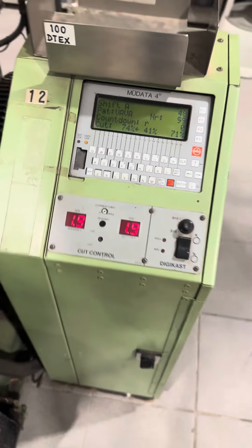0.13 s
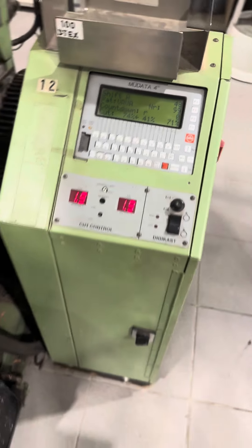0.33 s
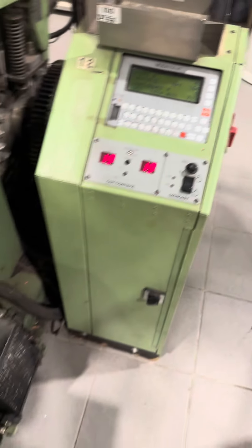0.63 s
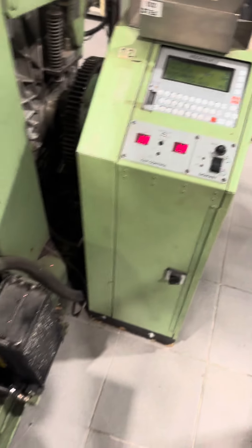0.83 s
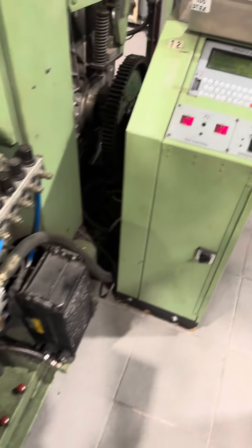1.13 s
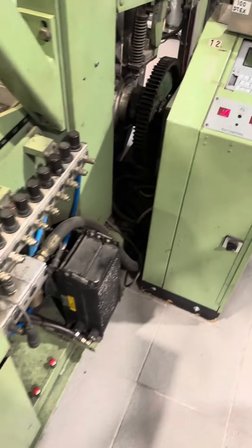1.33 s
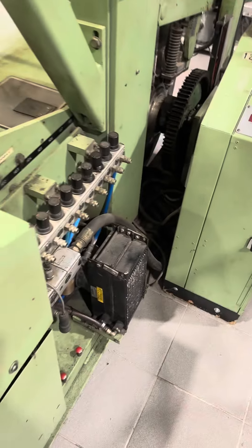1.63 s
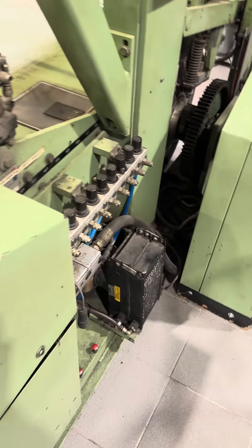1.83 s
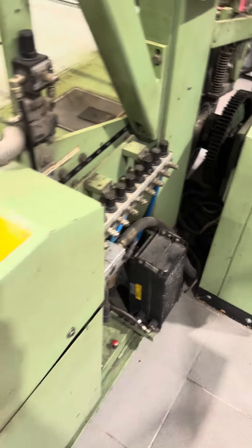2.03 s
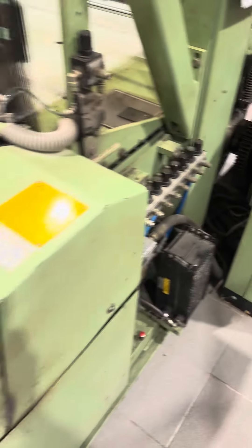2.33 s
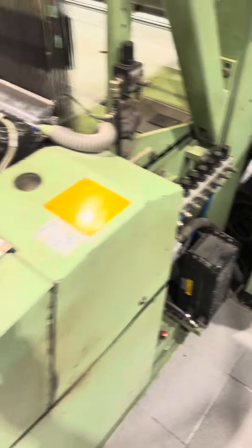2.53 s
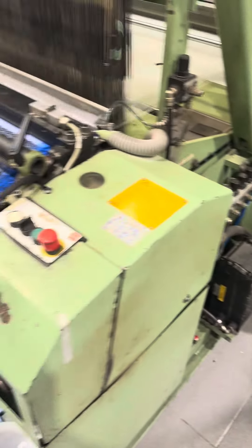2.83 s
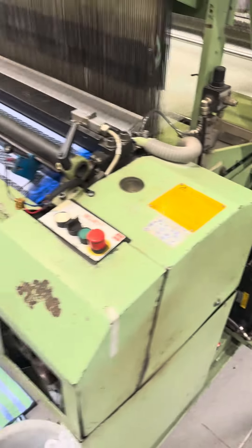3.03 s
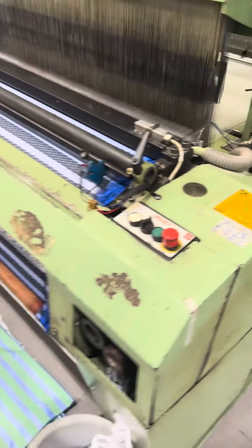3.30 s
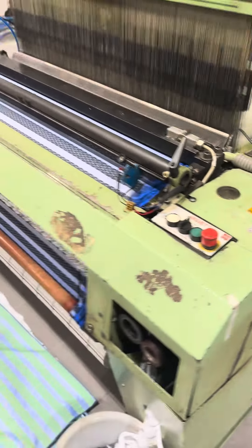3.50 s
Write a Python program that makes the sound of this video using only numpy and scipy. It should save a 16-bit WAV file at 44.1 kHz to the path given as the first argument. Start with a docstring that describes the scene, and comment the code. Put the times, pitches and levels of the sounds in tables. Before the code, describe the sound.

Loom running fast: sharp rattling clacks about ten times a second over low machine rumble and hiss.

```python
"""Label loom in a hall

A label loom weaves at steady speed in a factory hall while a phone is carried past it.
Every pick (one pass of the thread) throws a burst of harness clicks and a duller reed blow that rings loose parts.
The drive rumbles and hums in a pattern tied to a cycle of two picks; a thin whine, hiss and two knocks join in.
Two microphone ports hear it, with a difference in loudness and phase that changes with frequency."""
import sys
import numpy as np
from scipy import signal
from scipy.fft import rfft, irfft, next_fast_len
from scipy.io import wavfile
from scipy.ndimage import uniform_filter1d, map_coordinates

SR = 44100
rng = np.random.default_rng(int(sys.argv[2]) if len(sys.argv) > 2 else 0)


def gain_from_db(level_db):
    """Turn a decibel level (scalar or array-like) into a linear amplitude factor."""
    decades = np.asarray(level_db, float) / 20
    return 10 ** decades


def master(y):
    """Save y as 16-bit WAV."""
    cut = np.clip(np.atleast_2d(y).T, -1, 1)
    pcm = np.round(cut * 32767)  # scale
    wavfile.write(sys.argv[1], SR, pcm.astype(np.int16))


N = 161406
T = np.arange(N) / SR  # time of each sample, s
PICKS_PER_S, FIRST_PICK_S = 10.526, 0.001577
CYCLE_S = 2 / PICKS_PER_S
REED_LATE_S = 0.0034  # the reed blow after the clatter

# Levels as the phone moves: time_s, clatter_db, clatter_tilt_db_per_octave (roughly), reed_db, drive_db, hum_db
PHONE_WALK = [(0, -22.5, 2, -26, -21, -22.5), (.3, -21.5, 16, -23, -20.5, -24.5),
              (.75, -19, 6, -18, -19, -24), (1.3, -15, 3, -19, -20.5, -22.5),
              (1.7, -16, 4, -19.5, -19.5, -23), (2, -15.5, 4.5, -19.5, -20.5, -24),
              (2.4, -18, 1.5, -21, -21, -24.5), (3, -20, 2, -22.5, -21, -25),
              (3.66, -19, 5.2, -24, -21, -25.5)]
# Harness clatter, shape of its spectrum at the right port: pitch_hz, level_db
HARNESS_SPECTRUM = [(800, -40), (2000, -5), (3200, -3), (4900, -6.5), (5700, 1), (7000, -1), (9000, -2),
                    (10500, -5), (13000, -3.5), (15800, -2.5)]
# Reed blow, shape of its spectrum: pitch_hz, level_db
REED_SPECTRUM = [(300, -46), (900, -2), (1450, -4), (2100, -7.5), (3500, -10), (6000, -12)]
# Drive rumble, shape of its spectrum before its tilt: pitch_hz, level_db
DRIVE_SPECTRUM = [(20, -52), (40, -8.5), (100, -5.5), (170, -3.5), (225, -3), (280, 1.5), (340, -7.5),
                  (400, -2), (460, -6.5), (560, -1.5), (800, -7), (1200, -13), (2000, -21.5), (4000, -29.5)]
# How much of the rumble's power comes from repeating patterns: pitch_hz, share
DRIVE_REPEATS = [(30, .4), (150, .55), (300, .55), (600, .35), (1000, .1), (2000, .02)]
# Shaft tones that beat together: turns_per_cycle, relative_level_db, time_in_cycle_where_they_agree_s
SURGING_TONES = [(42, 0, .0718), (43, -1.5, .0718), (44, -2.5, .0718), (46, -8.5, .0718), (48, -7, .0414),
                 (50, -7, .0414)]
# Weaker shaft tones: turns_per_cycle, relative_level_db
WEAK_TONES = [(20, -14)]
# Air hiss and hall noise, shape of the spectrum: pitch_hz, level_db
AIR_SPECTRUM = [(1000, -20), (2500, 11), (4800, -1), (5700, 2), (9000, 8), (10500, 1), (15700, -6.5)]
# Hollow knocks close by: start_s, level_db
KNOCK_TIMES = [(.281, -10.5), (.383, -11)]
# Ringing tones in each knock: pitch_hz, relative_level_db, time_to_fall_60_db_s
KNOCK_TONES = [(520, -2, .03), (850, 0, .025), (1200, -3, .02)]
# Left port compared with the right: pitch_hz, level_db
LEFT_OVER_RIGHT = [(40, 0), (100, -3.5), (150, -10), (220, -12.5), (380, -5), (700, -3), (1290, -1),
                   (2400, .8), (8000, 0)]
# How much of the left port's amplitude is shared with the right: pitch_hz, share
PORTS_ALIKE = [(40, .99), (250, .62), (350, .82), (800, .9), (1200, .72), (1700, .5), (2300, .25),
               (3200, .3), (4000, .7), (4800, .3), (5500, .99), (7200, .995), (9000, .8), (10500, .97),
               (12000, .995), (13700, .96), (15000, .88)]
# Phase by which the right port leads the left: pitch_hz, lead_rad
RIGHT_LEADS = [(40, .1), (130, .55), (200, 1.6), (350, 3.1), (560, 3.1), (1000, 3.8), (1500, 4.8),
               (2000, 5.8), (2600, 4.2), (3500, .4), (4300, .1), (4900, 3), (5450, 6.25), (6800, 6.35),
               (8000, 7.2), (10400, 9.35), (13700, 9.45), (14200, 10), (15700, 10.9)]


def unit(x):
    """Scale a sound to an rms of 1."""
    return x / np.sqrt(np.mean(x ** 2) + 1e-20)


def along(points, hz):
    """Read a curve of (hz, value) points, joined by straight lines on a log frequency axis."""
    f, v = np.transpose(points)
    return np.interp(np.log(hz + 1), np.log(f + 1), v)


def walk(column):
    """One column of the phone's walk, per sample."""
    return np.interp(T, [row[0] for row in PHONE_WALK], [row[column] for row in PHONE_WALK])


def wobble(rate):
    """A smooth random curve with rate random points a second."""
    points = rng.standard_normal(int(N * rate / SR) + 4)
    return map_coordinates(points, [T * rate])


def filtered(x, response):
    """Multiply the spectrum of x by a response, which may also turn the phase."""
    m = next_fast_len(N + SR // 2)
    return irfft(rfft(x, m) * response(np.fft.rfftfreq(m, 1 / SR)), m)[..., :N]


def shaped(x, spectrum):
    """Colour x with a table of levels in dB."""
    return filtered(x, lambda hz: gain_from_db(along(spectrum, hz)))


def tilt_part(x, low_hz, high_hz, middle_hz):
    """The part to add to x, times a slope, to tilt it by about that many dB per octave."""
    return filtered(x, lambda hz: np.log2(np.clip(hz, low_hz, high_hz) / middle_hz) * np.log(10) / 20)


def patchy(x, patchy_db, bins, frames):
    """Random gain patches over time and frequency, alike in both channels."""
    z = signal.stft(x, nperseg=256)[2]
    field = rng.standard_normal(z.shape[1:])
    field = uniform_filter1d(field, bins, axis=0)
    field = uniform_filter1d(field, frames, axis=1)
    return signal.istft(z * gain_from_db(patchy_db * unit(field)), nperseg=256)[1][:, :N]


def rattle(per_s):
    """Dense tiny contacts of uneven size over a blur of farther ones."""
    click_share = .4  # of the power
    hits = rng.random(N) < per_s / SR
    clicks = hits * rng.standard_normal((2, N)) * gain_from_db(1.5 * rng.exponential(size=N))
    blur = rng.standard_normal((2, N))
    return np.sqrt(click_share) * unit(clicks) + np.sqrt(1 - click_share) * blur


def bursts(picks, late_s, rise_s, fall_db_per_s):
    """Power of the bursts: a bell-shaped rise at each pick, then a steady fall in dB."""
    power = np.zeros(N)
    for s, db, stretch in picks:
        near = slice(max(0, int((s - .05) * SR)), max(0, int((s + .25) * SR)))
        u = (T[near] - s - late_s) / stretch
        rise = np.exp(-np.abs(u / rise_s) ** 2.4)
        fall = gain_from_db(-2 * fall_db_per_s * np.abs(u))  # doubled dB, because this is power
        power[near] += gain_from_db(2 * db) / stretch * np.where(u < 0, rise, fall)
    return power


def clacks(picks):
    """Each blow rings six loose parts, each at a random pitch and moment."""
    middle_hz, spread_octaves, scatter_s = 1650, .4, .007
    out, t = np.zeros(N + SR), np.arange(SR // 10) / SR
    draw = rng.standard_normal((len(picks), 6, 3))
    for (s, db, _), parts in zip(picks, draw):
        for late, pitch, size in parts:
            at = round((s + REED_LATE_S + scatter_s * late) * SR)
            if at >= 0:
                hz = middle_hz * 2 ** (spread_octaves * pitch)
                t60_s = .08 * np.sqrt(middle_hz / hz)  # higher parts die sooner
                fade = gain_from_db(db + 2.6 * size - 60 * t / t60_s)
                soft_start = 1 - np.exp(-t / 0.0019)
                out[at:at + len(t)] += fade * np.sin(2 * np.pi * hz * t) * soft_start
    return out[:N]


def weaving():
    """Each pick shakes the harness into a burst of tiny clicks, and the reed lands a duller blow."""
    k = np.arange(-1, N / SR * PICKS_PER_S + 1)
    late, louder, longer = rng.standard_normal((3, len(k)))
    # Each pick: time in s, level in dB, stretch of its burst
    picks = np.transpose([FIRST_PICK_S + k / PICKS_PER_S + .001 * late, .35 * louder, np.exp(.1 * longer)])

    parts = patchy(rattle(5000), 1, bins=5, frames=12)
    parts = patchy(parts, 1.6, bins=14, frames=3)
    flat = unit(shaped(parts, HARNESS_SPECTRUM))
    tilted = flat + walk(column=2) * tilt_part(flat, 500, None, 7000)
    shake = bursts(picks, 0, rise_s=.0115, fall_db_per_s=520)
    clatter = gain_from_db(walk(column=1)) * np.sqrt(shake) * tilted

    reed = unit(shaped(patchy(rattle(1250), 2.4, bins=2, frames=8), REED_SPECTRUM))
    blow = bursts(picks, REED_LATE_S, rise_s=0.014, fall_db_per_s=460)
    rung = gain_from_db(-8) * np.array([clacks(picks), clacks(picks)])
    return clatter + gain_from_db(walk(column=3)) * (np.sqrt(blow) * reed + rung)


def looped(picks):
    """Noise that returns every so many picks, morphing slowly between three patterns."""
    length = picks * SR / PICKS_PER_S
    place = np.rint(np.arange(N) % length).astype(int)
    mix = np.array([wobble(1.5) for _ in range(3)])
    patterns = rng.standard_normal((2, 3, int(length) + 2))[..., place]
    return (patterns * mix).sum(axis=1) / np.sqrt((mix ** 2).sum(axis=0))


def drive():
    """Cams, shafts and frame: a rumble that partly repeats with the cycle."""
    every_pick = .45  # share of the repeating power that returns every pick, the rest every two
    cyclic = np.sqrt(every_pick) * looped(picks=1) + np.sqrt(1 - every_pick) * looped(picks=2)
    free = patchy(rng.standard_normal((2, N)), 2.43, bins=2, frames=12)

    def share(hz):
        """Share of the power that repeats."""
        return np.clip(along(DRIVE_REPEATS, hz), 0, 1)

    rumble = filtered(shaped(cyclic, DRIVE_SPECTRUM), lambda hz: np.sqrt(share(hz)))
    rumble += filtered(shaped(free, DRIVE_SPECTRUM), lambda hz: np.sqrt(1 - share(hz)))
    rumble = unit(rumble)
    slope = -1.97 + .5 * T  # about dB per octave, brightening on the way round the loom
    return gain_from_db(walk(column=4)) * (rumble + slope * tilt_part(rumble, 300, 1200, 500))


def gears():
    """Shaft tones that surge once a cycle, weaker ones and a pair of higher tones from meshing gears."""
    turn = 2 * np.pi * T / CYCLE_S
    hum = np.zeros(N)
    for order, db, s in SURGING_TONES:
        phase = order * (turn - 2 * np.pi * s / CYCLE_S) + .25 * wobble(1)
        hum += gain_from_db(db + .8 * wobble(2)) * np.cos(phase)
    for order, db in WEAK_TONES:
        hum += gain_from_db(db + 2.5 * wobble(1.2)) * np.cos(order * turn + 2 * np.pi * rng.random())
    whine = np.zeros(N)
    for order in (107, 108):  # turns per cycle
        whine += gain_from_db(2.6 * wobble(4.86)) * np.sin(order * turn + 0.83 * wobble(3.99))
    whine_db = -32.5 - 2 * T  # fades by 2 dB a second
    return unit(hum) * gain_from_db(walk(column=5)) + gain_from_db(whine_db) * whine


def air():
    """Hiss of air and the blurred rattle of the other machines in the hall."""
    hiss = shaped(patchy(rattle(2500), 1.8, bins=6, frames=12), AIR_SPECTRUM)
    return gain_from_db(-36) * unit(hiss)


def knocks():
    """Short hollow knocks, each a few tones that start together and die away."""
    out, t = np.zeros(N), np.arange(SR // 10) / SR
    soft_start = 1 - np.exp(-t / 0.00039)
    for s, db in KNOCK_TIMES:
        ring = np.zeros(len(t))
        for hz, level, t60_s in KNOCK_TONES:
            ring += gain_from_db(level + rng.normal(0, 1.7) - 60 * t / t60_s) * np.sin(2 * np.pi * hz * t)
        out[round(s * SR):][:len(t)] += gain_from_db(db) * ring * soft_start
    return out


def scene():
    """Channel 0 is the sound at the right port, channel 1 feeds the part that only the left port hears."""
    field = weaving() + drive() + air()
    return field + gears() * [[1], [.3]]


def band_limit(x):
    """A steep low-pass at the top of the band."""
    return signal.sosfilt(signal.butter(12, 17130, fs=SR, output="sos"), x)


def record(dry):
    """The left port hears a turned, coloured copy of the right plus its own share; knocks arrive opposed."""
    def alike(hz):
        """Share of the left amplitude that is common to both ports."""
        return np.clip(along(PORTS_ALIKE, hz), 0, 1)

    coloured = shaped(dry, LEFT_OVER_RIGHT)
    left = filtered(coloured[0], lambda hz: alike(hz) * np.exp(-1j * along(RIGHT_LEADS, hz)))
    left += filtered(coloured[1], lambda hz: np.sqrt(1 - alike(hz) ** 2))
    ports = np.array([left, dry[0]]) + knocks() * [[1], [-1]]
    mix = filtered(ports, lambda hz: hz < 15850)  # nothing higher is kept
    return band_limit(mix)


dry = scene()
out = record(dry)
master(out)
```